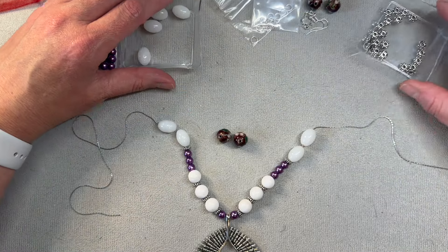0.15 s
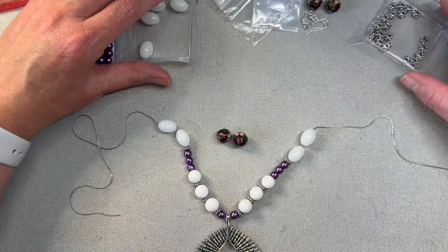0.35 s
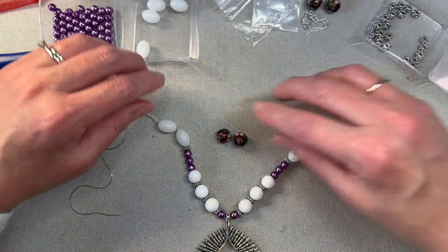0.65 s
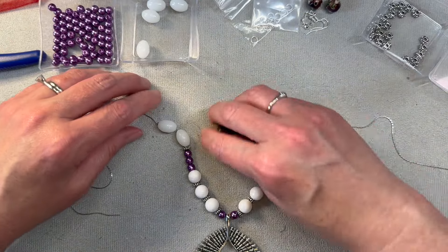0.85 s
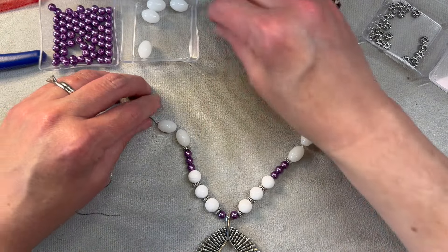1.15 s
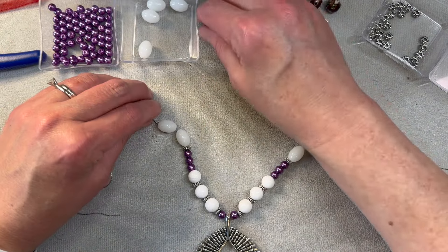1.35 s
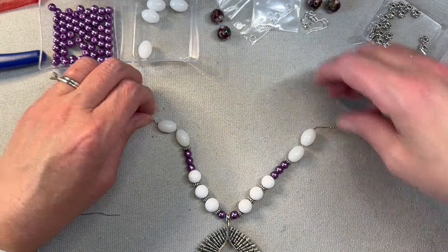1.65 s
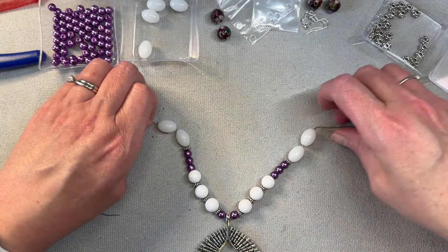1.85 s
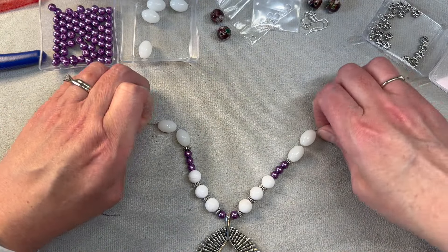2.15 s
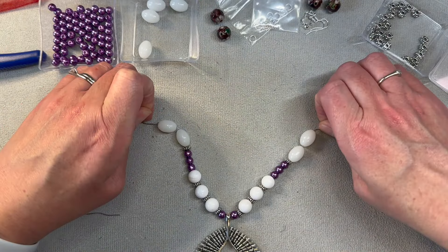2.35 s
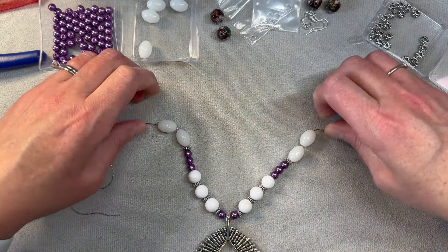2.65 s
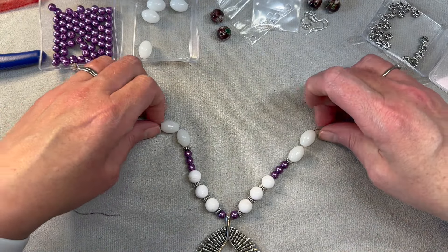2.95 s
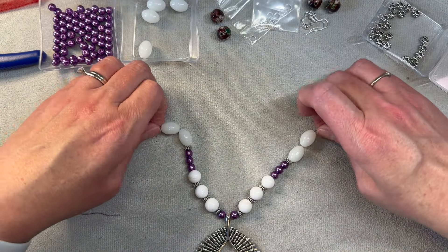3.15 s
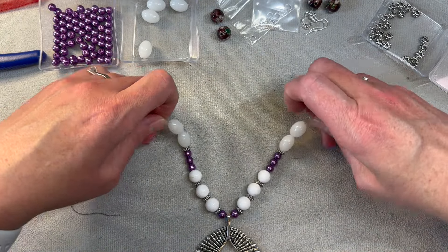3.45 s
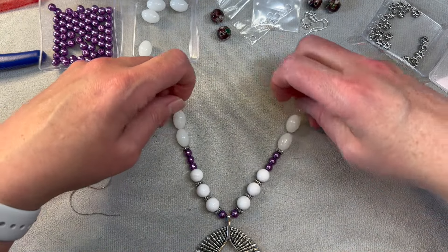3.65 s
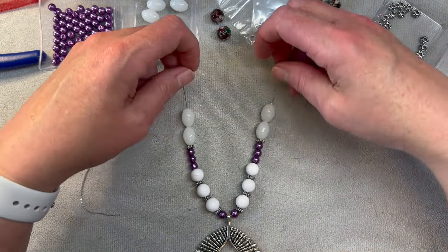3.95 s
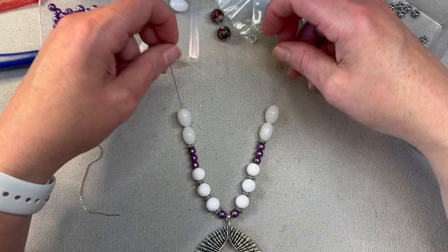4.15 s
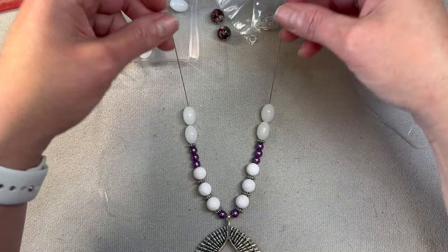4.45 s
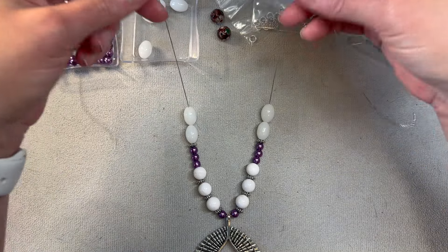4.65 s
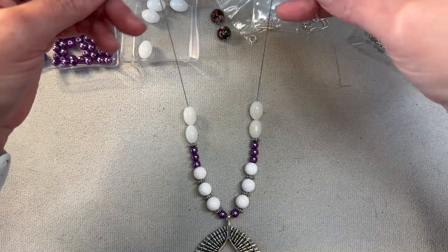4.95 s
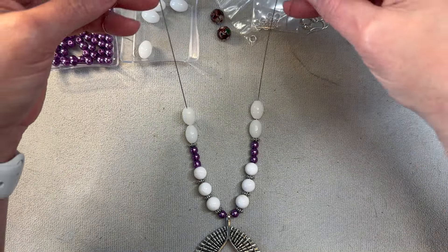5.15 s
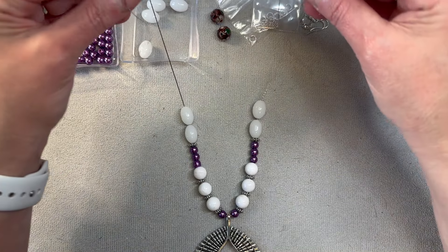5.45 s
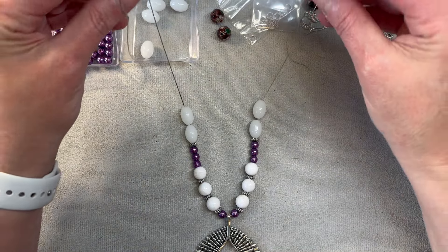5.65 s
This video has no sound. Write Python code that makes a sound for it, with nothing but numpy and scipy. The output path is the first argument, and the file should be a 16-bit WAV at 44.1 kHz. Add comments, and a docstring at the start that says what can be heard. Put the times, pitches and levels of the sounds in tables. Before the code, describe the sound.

Beadwork at a cloth-covered table, heard very near with little room echo over low hum and soft air. First a bright, brittle flurry of plastic tray clacks; next muffled bumps, short juddering skin-on-cloth rubs and beads tapping down; finally cushioned raps, thin high ticks, faint wire sliding and a sharp rattling snap near the end, leaving mostly room tone.

```python
"""A quiet, humming room with a cloth-covered table: beadwork heard close up, in the stereo of a phone.
Hum, whine, air and hiss are steady tones and coloured noise; hands rub with juddering tones and rustle.
Knocks set the table modes ringing, and thin plastic trays clack with cracks, wall rings and hollow notes.
A necklace is lifted by its wire: beads tick as high snaps over rings, and the wire slides, pings and rattles."""
import sys
import numpy as np
from scipy import signal
from scipy.fft import rfft, irfft, next_fast_len
from scipy.io import wavfile
from scipy.ndimage import uniform_filter1d, map_coordinates

SR = 44100
rng = np.random.default_rng(int(sys.argv[2]) if len(sys.argv) > 2 else 0)


def pcm_store(signal):
    """Save signal as 16-bit PCM."""
    levels = np.round(np.clip(np.atleast_2d(signal), -1, 1) * 32767)
    wavfile.write(sys.argv[1], SR, levels.astype(np.int16).T)


N = 256163


def amp(db):
    """Decibels to gain."""
    return 10 ** (np.asarray(db) / 20)


def unit(x):
    """Scaled to rms 1."""
    return x / np.sqrt(np.mean(x ** 2) + 1e-20)


def peaked(x, size=128):
    """Scaled so that its loudest few milliseconds have rms 1."""
    power = np.mean(np.atleast_2d(x) ** 2, 0)
    return x / np.sqrt(uniform_filter1d(power, size).max())


def along(points, hz):
    """(Hz, value) points read on a log frequency axis."""
    point_hz, value = np.transpose(points)
    return np.interp(np.log(hz + 1), np.log(point_hz + 1), value)


def wobble(rate):
    """A smooth random curve through rate knots a second."""
    knots = rng.standard_normal(2000)
    return map_coordinates(knots, [np.arange(N) * rate / SR], mode="mirror")


def swell(start, length, rise, fall):
    """Gain of one movement: it rises, holds, and falls away around its end."""
    t = np.arange(N) / SR - start
    ramps = np.clip(t / rise, 0, 1) * np.clip((length - t) / fall + .5, 0, 1)
    return np.sin(np.pi / 2 * ramps)


def add(track, s, sound):
    """Mix a sound in at time s."""
    part = track[:, max(round(s * SR), 0):][:, :sound.shape[-1]]
    part += sound[..., :part.shape[1]]


def filtered(x, response):
    """The sound x shaped by a response of frequency."""
    n = x.shape[-1]
    m = next_fast_len(n + 4096, True)  # spare room for the ringing
    return irfft(rfft(x, m) * response(np.fft.rfftfreq(m, 1 / SR)), m)[..., :n]


def colour(points):
    """The minimum-phase response with this (Hz, dB) spectrum, so nothing rings before a blow."""
    def response(hz):
        cepstrum = irfft(np.log(amp(along(points, hz))))
        half = len(cepstrum) // 2
        causal = np.r_[cepstrum[0], 2 * cepstrum[1:half], np.zeros(half)]
        return np.exp(rfft(causal))
    return response


def resonances(modes):
    """The response of a body with (Hz, width Hz, dB) modes, added with alternating sign."""
    def mode(f, centre, width, db):
        return amp(db) * 1j * f * width / (centre * centre - f * f + 1j * f * width)

    return lambda f: sum((-1) ** k * mode(f, *row) for k, row in enumerate(modes))


def struck(modes, detune):
    """A body's response to one blow: the grip shifts its modes, the spot struck sets their strengths."""
    shift, strength = rng.standard_normal((2, len(modes)))
    hz, width, db = np.transpose(modes)
    return resonances(list(zip(hz * (1 + detune * shift), width, db + 1.5 * strength)))


def noise(response):
    """Two unrelated coloured noises of joint rms 1."""
    return unit(filtered(rng.standard_normal((2, N)), response))


def grains(rate, spread_db):
    """Sparse random slips of unequal size, rate a second on average."""
    happens = rng.random(N) < rate / SR
    return happens * rng.standard_normal(N) * amp(spread_db * rng.standard_normal(N))


def burst(rise, t60):
    """The chatter of one contact: separate noise left and right, swelling fast and dying by 60 dB in t60."""
    t = np.arange(SR // 8) / SR
    chatter = rng.standard_normal((2, len(t)))
    return chatter * (1 - np.exp(-t / rise)) ** 2 * amp(-60 * t / t60)


def contact(rise, t60, chatter_db):
    """One clean impact, the same left and right, amid a scatter of chatter."""
    push = burst(rise, t60)
    push = amp(chatter_db) * push / np.linalg.norm(push[0])
    return push + (np.arange(push.shape[1]) == round(.002 * SR))  # the impact comes at 2 ms


# tones of a mains-driven motor: pitch_hz, level_db
HUM_TONES = [(56.1, -47), (168.3, -61.5)]
# spectrum of moving air: pitch_hz, level_db
AIR_SPECTRUM = [(20, -31), (35, -20.5), (48, -9.5), (66, -5), (90, -13), (200, -14.5), (300, -23),
                (470, -27.5), (850, -28), (1150, -31.5), (1700, -37.5), (2600, -45), (4400, -54.5),
                (9000, -73)]
# low resonances of the room: pitch_hz, width_hz, level_db
LOW_ROOM_MODES = [(118.8, 12.7, 1), (161.8, 32.3, -4.5), (236.6, 19.9, 1), (356.4, 39, -14)]
# spectrum of microphone hiss: pitch_hz, level_db
HISS_SPECTRUM = [(3000, -23), (5000, -9.5), (6900, 1), (8500, -12.5), (11000, -27), (15000, -6),
                 (16000, -21.5)]
WHINE_HZ, WHINE_DB, WHINE_START_S, WHINE_RISE_S = 206.8, -57, 4.05, 0.88


def background():
    """Nearly steady hum sines and a whine that joins them, over air, low room-mode noise and hiss."""
    t = np.arange(N) / SR
    hum = sum(amp(db + 0.11 * wobble(4.5)) * np.sin(2 * np.pi * (hz * t + rng.random()))
              for hz, db in HUM_TONES)
    joining = np.clip((t - WHINE_START_S) / WHINE_RISE_S, 0, 1)
    whine = amp(WHINE_DB) * joining * np.sin(2 * np.pi * WHINE_HZ * t + 0.335 * wobble(2.5))
    air = amp(-55.0) * noise(colour(AIR_SPECTRUM))
    room = amp(-58.0) * noise(resonances(LOW_ROOM_MODES))
    hiss = amp(-76) * noise(colour(HISS_SPECTRUM))
    return hum + whine + air + room + hiss


# strokes on the cloth: start_s, length_s, judder_db and rustle_db at mid-stroke, start_pitch_hz of the judder
RUB_STROKES = [(0.0, 0.093, -55.5, -65, 402), (0.783, 0.064, -45, -57, 270),
               (0.874, 0.047, -50.5, -61, 420), (1.434, 0.086, -64.5, -60.5, 417),
               (1.503, 0.06, -46.5, -58.5, 325), (1.577, 0.065, -45.5, -66.5, 225.3),
               (1.722, 0.054, -47.5, -61, 275), (2.008, 0.055, -50, -63.5, 270),
               (2.673, 0.016, -49.5, -55.5, 364), (2.714, 0.062, -46.5, -76, 235.1),
               (2.803, 0.038, -48.5, -67, 195), (2.857, 0.035, -55.5, -64, 260),
               (2.928, 0.028, -51, -61.5, 280), (3.309, 0.061, -50.5, -66, 216),
               (3.352, 0.062, -52.5, -63.5, 330), (3.435, 0.056, -54, -64.5, 301)]
# spectrum of rubbed cloth: pitch_hz, level_db
CLOTH_SPECTRUM = [(250, -16.5), (480, 3.5), (650, -1), (950, -2.5), (1300, -13.5), (2200, -27.5),
                  (6000, -41), (15000, -41)]
# resonances of the table top, for rubs and knocks alike: pitch_hz, width_hz, level_db
TABLE_MODES = [(133.5, 8.4, 8), (227, 41, 1.5), (260, 33.6, 2), (391, 55, -1), (466, 71, -17)]
RUB_RISE_S, RUB_FALL_S = 0.021, 0.017
JUDDER_SAG_OCTAVES_PER_S = 3.5  # the hand slows through a stroke
JUDDER_GROWS_DB_PER_S, RUSTLE_FADES_DB_PER_S = 49, 61.5  # sliding gives way to sticking
SHAKE_DB = -4.5  # the table's answer, relative to the judder


def hands():
    """Skin sticks and slips on cloth: as the hand slows, rustle fades and a sinking judder shakes the table."""
    t = np.arange(N) / SR
    shake = unit(filtered(grains(rate=2000, spread_db=1), resonances(TABLE_MODES)))
    rustle = unit(filtered(grains(rate=2000, spread_db=2), colour(CLOTH_SPECTRUM)))
    # the slips come in lumps, unevenly timed around the pitch of the moment
    lumps = amp(2.5 * wobble(120))
    waver = .9 * wobble(110)  # radians
    out = np.zeros(N)
    for s, length, judder_db, rustle_db, start_hz in RUB_STROKES:
        age = np.clip(t - s, 0, length)
        past_middle = age - length / 2
        pitch = start_hz * 2 ** (-JUDDER_SAG_OCTAVES_PER_S * age)
        judder = unit(lumps * np.sin(2 * np.pi * np.cumsum(pitch) / SR + waver))
        sticking_gain = amp(judder_db + JUDDER_GROWS_DB_PER_S * past_middle)
        sticking = sticking_gain * (judder + amp(SHAKE_DB) * shake)
        sliding = amp(rustle_db - RUSTLE_FADES_DB_PER_S * past_middle) * rustle
        out += swell(s, length, RUB_RISE_S, RUB_FALL_S) * (sticking + sliding)
    return np.array([out, out])


# beads and fingers landing on the table: start_s, level_db, rap_db relative to level_db, bump_pitch_hz
TABLE_KNOCKS = [(0.776, -42.5, -10.5, 191), (0.798, -41, -31.5, 235), (0.808, -39.5, -17, 338),
                (0.838, -45, -6, 151), (0.909, -54.5, 3.5, 380), (0.92, -43, -8, 419),
                (1.274, -42, -1, 477), (1.282, -39.5, -6, 1205), (1.332, -44, -8, 440),
                (1.346, -50, -2, 497), (1.469, -40.5, -6.5, 380), (1.6876, -40.5, -12, 284.3),
                (1.991, -41, -11.5, 230), (2.038, -47, -13, 272), (2.717, -43, -14, 240),
                (2.835, -45.5, -24.5, 158.5), (3.554, -35, 5, 337), (3.569, -33, 4, 900),
                (3.816, -37.5, 0, 303), (4.056, -47, -6, 350), (4.204, -38, 0.5, 422),
                (4.446, -41.5, 0, 401), (4.589, -43, -10, 256), (4.988, -53.5, -9, 350)]
# spectrum of a hard rap: pitch_hz, level_db
RAP_SPECTRUM = [(200, -3), (420, 8.5), (620, -4.5), (830, 8), (1050, 1.5), (1300, -8.5), (2000, -22),
                (2700, -35.5), (3600, -46.5), (6000, -57)]
CUSHION_HZ = 1300  # the cloth softens a blow above this
BUMP_DB, BUMP_Q = -1.5, 3  # the damped note of the spot that is struck
THUD_DB, BOOM_DB = -4.5, -16.5  # upper table modes; lowest mode when rap_db is 0
BOOM_PER_RAP = 0.71  # soft fingers boom, hard beads rap: dB of boom lost per dB of rap
BRIGHT_RAP_DB, BRIGHTENS = -29.5, 6.1  # dB per octave, 1100 to 2200 Hz, for each dB above this level


def knocks():
    """A blow cushioned by cloth rings the table top; soft ones boom, hard ones add a brightening rap."""
    out = np.zeros((2, N))
    for s, db, rap_db, bump_hz in TABLE_KNOCKS:
        push = np.abs(burst(rise=0.00045, t60=0.003)[0])
        push = filtered(push, lambda hz: 1 / (1 + 1j * hz / CUSHION_HZ) ** 2)
        thud = peaked(filtered(push, resonances(TABLE_MODES[1:])))
        boom = peaked(filtered(push, resonances(TABLE_MODES[:1])))
        bump = peaked(filtered(push, resonances([(bump_hz, bump_hz / BUMP_Q, 0)])))
        # the harder the blow, the less treble the cloth takes away
        slope_db = BRIGHTENS * (db + rap_db - BRIGHT_RAP_DB)
        hardness = lambda hz: amp(slope_db * np.log2(np.clip(hz / 1100, 1, 2)))
        blow = contact(rise=0.003, t60=0.02, chatter_db=-5)[0]
        rap = peaked(filtered(blow, lambda hz: colour(RAP_SPECTRUM)(hz) * hardness(hz)))
        boom_db = BOOM_DB - BOOM_PER_RAP * rap_db
        knock = amp(BUMP_DB) * bump + amp(THUD_DB) * thud + amp(boom_db) * boom + amp(rap_db) * rap
        add(out, s, amp(db) * knock)
    return out


# trays touching: start_s, level_db, hollow_db relative to level_db, chatter_t60_s, hollow_pitch_hz
CLACKS = [(0.0055, -41, -8.5, 0.043, 1880), (0.018, -47, -18, 0.02, 2170), (0.025, -53, -13.5, .016, 1420),
          (0.031, -48.5, 3.5, 0.035, 2000), (0.043, -37, -11.5, 0.032, 1300),
          (0.05, -31.5, -16.5, 0.033, 1300), (0.0554, -33.5, -14.5, 0.046, 1970),
          (0.0686, -39.5, -10.5, 0.024, 1490), (0.074, -55, -12, .02, 2380),
          (0.1117, -29, -12.5, 0.042, 1237), (0.1424, -27.5, -21, 0.045, 1400),
          (0.1447, -25, -16, 0.039, 2392), (0.219, -58, 3, 0.015, 1260), (0.263, -56.5, -0.5, 0.028, 1300),
          (0.2761, -40.5, -1.5, 0.064, 1280), (0.287, -42.5, -6.5, 0.034, 1400),
          (0.329, -38, -5, 0.037, 1140), (0.347, -54.5, -1, 0.045, 1300), (0.387, -48, -7, 0.057, 1260),
          (0.3972, -30, -18, 0.023, 1260), (0.400, -21, -20.5, 0.032, 1260), (0.4197, -47, -3, 0.014, 1140),
          (0.9365, -43, -16, 0.075, 3350), (5.5292, -60.5, 10.5, 0.0076, 1234)]
# ringing thin plastic walls: pitch_hz, width_hz, level_db
WALL_MODES = [(2900, 180, -5), (3550, 160, -4), (4920, 220, 6.5), (5670, 160, 3), (6100, 200, 5),
              (6400, 190, 3.5), (7070, 150, 3), (8050, 180, 4), (9500, 200, -1), (13300, 250, 8),
              (14240, 250, 8.5), (15300, 250, 0)]
# spectrum of the crack: pitch_hz, level_db
CRACK_SPECTRUM = [(700, -24), (2000, -8.5), (4200, -7), (5200, -4.5), (7500, 0.5), (9500, 2), (12500, 0),
                  (16000, -13)]
# air and floor of a tray: pitch_hz, width_hz, level_db
HOLLOW_MODES = [(1260, 159, 4), (1558, 140, 3), (1870, 180, -2.5), (2346, 170, 1.5), (3100, 870, -7.5)]
# loose beads shifting as a tray moves: start_s, length_s, level_db
BEAD_SHIFTS = [(-.01, 0.095, -54), (0.175, 0.18, -59.5), (0.898, 0.067, -56)]
CRACK_DB, WALL_DB = -5.5, -6  # relative to the clack's level; the wall figure is for a firm clack
FIRM_CLACK_DB, WALL_GROWS = -24, 0.41  # a firmer clack rings the walls more: dB per dB above this level
RATTLE_RISE_S, RATTLE_FALL_S = 0.0063, .03
JOSTLE_DB, JOSTLES_PER_S = 5.5, 280  # depth and knot rate of the flickering level


def jostle(response):
    """Noise through one part of a tray, its level flickering as if small contacts came in clumps."""
    return unit(noise(response) * amp(JOSTLE_DB * wobble(JOSTLES_PER_S)))


def trays():
    """A clack is a crack, a short ring of thin walls and a hollow note; moving makes the beads jostle."""
    out = np.zeros((2, N))
    lowest_hz = HOLLOW_MODES[0][0]
    for s, db, hollow_db, chatter_s, note_hz in CLACKS:
        crack = peaked(filtered(burst(rise=0.00044, t60=chatter_s), colour(CRACK_SPECTRUM)))
        hit = contact(rise=.001, t60=.016, chatter_db=3)
        ring = peaked(filtered(hit, struck(WALL_MODES, detune=0.006)))
        # the hollow modes rise together where the tray is struck at a stiffer spot
        body = [(hz * note_hz / lowest_hz, width, level) for hz, width, level in HOLLOW_MODES]
        hollow = peaked(filtered(burst(rise=0.00038, t60=chatter_s), struck(body, detune=0.014)))
        wall_db = WALL_DB + WALL_GROWS * (db - FIRM_CLACK_DB)
        clack = amp(CRACK_DB) * crack + amp(wall_db) * ring + amp(hollow_db) * hollow
        add(out, s, amp(db) * clack)
    # separate flicker lets each moment favour the walls or the floor of the tray
    slide = amp(1.0) * jostle(colour(CRACK_SPECTRUM))
    slide = slide + amp(-16.5) * jostle(resonances(WALL_MODES))
    slide = slide + amp(-6.5) * jostle(resonances(HOLLOW_MODES))
    moving = sum(amp(db) * swell(s, length, RATTLE_RISE_S, RATTLE_FALL_S) for s, length, db in BEAD_SHIFTS)
    return out + slide * moving


# spectrum of a bead's snap, also of the wire: pitch_hz, level_db
SNAP_SPECTRUM = [(4000, -38), (7500, -14), (9000, -9), (9800, -7.5), (11000, -1), (12700, -7.5),
                 (14600, 0.5), (16000, -13)]
# lower ring of the beads: pitch_hz, width_hz, level_db
RING_MODES = [(1800, 260, -2), (2520, 130, 1), (2820, 120, -1), (3450, 140, -3), (4380, 200, 1),
              (4950, 120, 3), (5330, 200, 4), (6100, 190, 11), (7600, 200, 1), (8480, 120, 5),
              (9140, 250, 4)]
QUIVER_START_S, QUIVER_DB, QUIVER_RING_DB, QUIVER_T60_S = 4.745, -50.5, -8.5, 0.29


def wire_rattle():
    """The flicked end of the wire quivers against the beads in ever weaker contacts."""
    t = np.arange(SR // 2) / SR
    touches = grains(rate=1000, spread_db=1.5)[:len(t)]
    snap = unit(filtered(touches, colour(SNAP_SPECTRUM)))
    ring = unit(filtered(touches, resonances(RING_MODES)))
    return amp(QUIVER_DB - 60 * t / QUIVER_T60_S) * (snap + amp(QUIVER_RING_DB) * ring)


# beads and wire ticking: start_s, level_db, ring_db relative to level_db, scrape_t60_s
TICKS = [(1.141, -52, -3, 0.012), (1.2655, -45, -2, .035), (1.271, -41, -5.5, 0.036),
         (1.37, -54, -2.5, 0.018), (2.952, -52.5, -14, 0.0069), (3.342, -40, -28.5, 0.0065),
         (3.551, -53, -18, 0.0076), (3.734, -51.5, -12, 0.0076), (3.845, -50.5, -29, 0.0055),
         (3.873, -46, -17, 0.0054), (4.1085, -44, -24, 0.0046), (4.237, -42.5, -20, 0.0034),
         (4.48, -46, -19, 0.0049), (4.7202, -31.5, -17, 0.019), (4.725, -25.5, -16, 0.016),
         (5.056, -30.5, -23.5, 0.0076), (5.07, -53, -16, 0.014), (5.279, -52.5, -6, 0.011),
         (5.313, -55.5, -14, .008), (5.331, -67, -15, .008), (5.362, -52, -12, 0.01),
         (5.41, -57, -31, 0.0086), (5.44, -49, -18, .01), (5.607, -51.5, -22, 0.025)]
# wire sliding through the fingers: start_s, length_s, level_db
SLIDES = [(1.604, 0.23, -85), (1.974, 0.091, -73), (2.375, 0.19, -85), (3.16, 0.26, -79.5),
          (5.282, 0.16, -71.5)]
# the free end of the wire singing: start_s, level_db, pitch_hz
PINGS = [(1.376, -64, 6130), (4.729, -54, 6070), (5.058, -56, 6190), (5.282, -64, 6050), (5.364, -62, 6120)]
WIRE_RISE_S, WIRE_FALL_S, PING_T60_S = .04, 0.028, .11


def beads():
    """Tiny hard contacts snap very high over a lower ring; the wire slides, pings and rattles."""
    sliding = sum(amp(db) * swell(s, length, WIRE_RISE_S, WIRE_FALL_S) for s, length, db in SLIDES)
    out = sliding * noise(colour(SNAP_SPECTRUM))
    for s, db, ring_db, scrape_s in TICKS:
        snap = peaked(filtered(burst(rise=0.0013, t60=scrape_s), colour(SNAP_SPECTRUM)))
        hit = contact(rise=.0004, t60=.012, chatter_db=-4)
        ring = peaked(filtered(hit, struck(RING_MODES, detune=.003)))
        add(out, s, amp(db) * (snap + amp(ring_db) * ring))
    t = np.arange(SR // 4) / SR
    for s, db, hz in PINGS:
        add(out, s, amp(db - 60 * t / PING_T60_S) * np.sin(2 * np.pi * hz * t))
    add(out, QUIVER_START_S, wire_rattle())
    return out


# reflections off the table top and nearby things: delay_s, gain
EARLY_ECHOES = [(.0034, 0.17), (.0062, 0.079), (0.0166, 0.059)]
# decay time of the room by frequency: pitch_hz, t60_s
ROOM_DECAY = [(120, 0.44), (800, 0.24), (3000, 0.37), (7000, 0.31), (15000, 0.11)]


def in_room(x, wet_db):
    """The sound with near reflections and a noise tail, each frequency dying at its own speed."""
    hz, t, z = signal.stft(rng.standard_normal((2, SR // 2)), SR, nperseg=256)
    decay = amp(-60 * t / along(ROOM_DECAY, hz)[:, None])
    build_up = 1 - np.exp(-t / 0.0027)
    tail = signal.istft(z * decay * build_up, SR, nperseg=256)[1]
    answer = amp(wet_db) * tail / np.linalg.norm(tail[0])
    # the same echoes come back left and right
    for delay, gain in EARLY_ECHOES:
        answer[:, round(delay * SR)] += gain
    return x + signal.fftconvolve(x, answer, axes=1)[:, :N]


def scene():
    """Everything on the table, in the room, over the background."""
    rubs = in_room(hands(), wet_db=-2.5)
    thumps = in_room(knocks(), wet_db=-6)
    clacks = in_room(trays(), wet_db=-9.5)
    ticks = in_room(beads(), wet_db=-9.0)
    return background() + rubs + thumps + clacks + ticks


# stereo image of the phone by frequency:
# pitch_hz, width (share of left-right difference kept), left_over_right_db, left_lag_rad
STEREO_IMAGE = [(50, .15, 1.9, 0), (300, .55, 3.2, 0), (1100, .9, .7, .3), (2600, .7, 2.5, 0),
                (4300, .7, 2, -.3), (6700, .8, 8, -.6), (8400, .3, 1, 0), (9400, .25, 0, 1.3),
                (10500, .05, 0, 2.9), (11600, .05, 0, 3.3), (12600, .2, 0, 4.8), (14000, .1, 0, 6.2),
                (16000, .2, 0, 6.7)]
TOP_HZ = 16100  # band limit


def record(dry):
    """The phone's stereo processing narrows, tilts and delays the image by frequency, under a band limit."""
    width, tilt_db, lag = [np.array(STEREO_IMAGE)[:, [0, k]] for k in range(1, len(STEREO_IMAGE[0]))]
    sides = np.array([[1], [-1]])  # left, right
    difference = filtered((dry[0] - dry[1]) / 2, lambda hz: along(width, hz))
    pair = dry.mean(0) + sides * difference
    tilt = lambda hz: amp(sides * along(tilt_db, hz) / 2)
    delay = lambda hz: np.exp(-.5j * sides * along(lag, hz))
    pair = filtered(pair, lambda hz: tilt(hz) * delay(hz))
    return filtered(pair, lambda hz: 1 / (1 + (hz / TOP_HZ) ** 120))


dry = scene()
out = record(dry)
pcm_store(out)
```